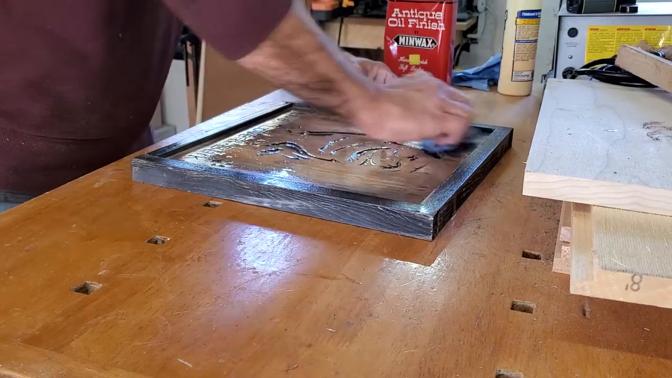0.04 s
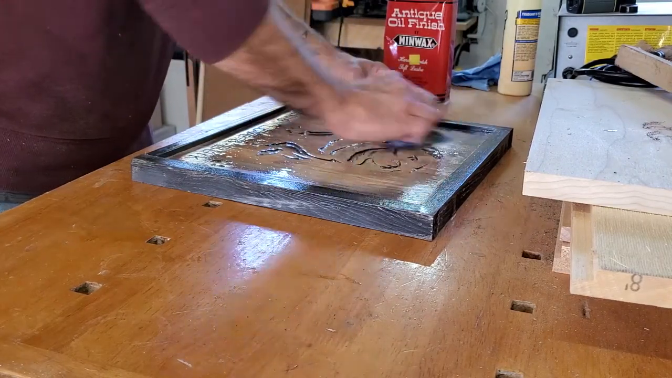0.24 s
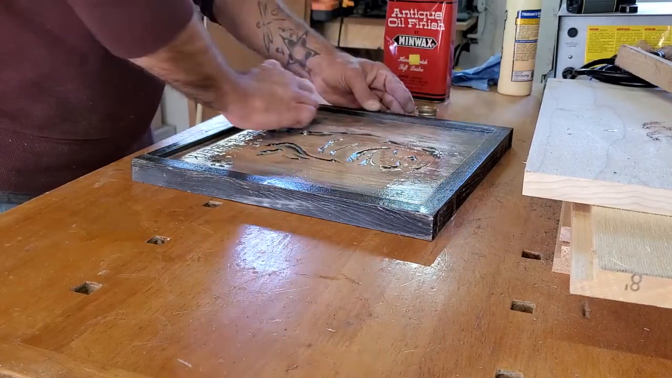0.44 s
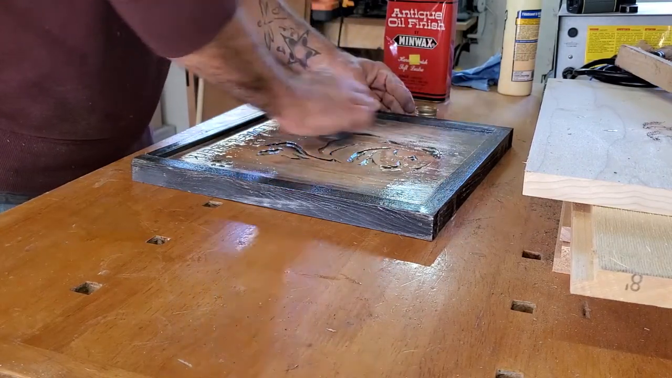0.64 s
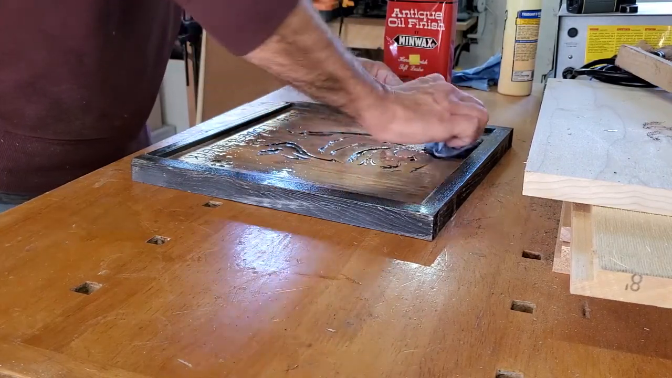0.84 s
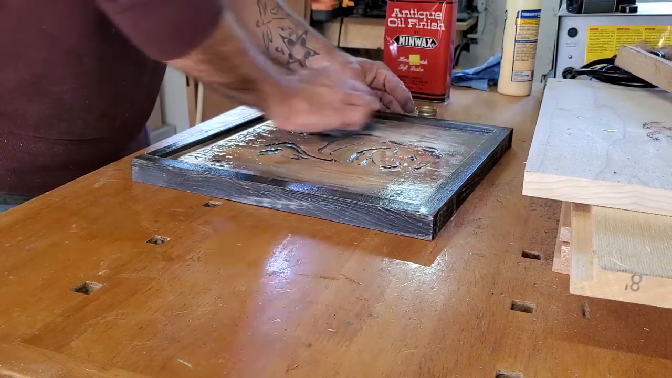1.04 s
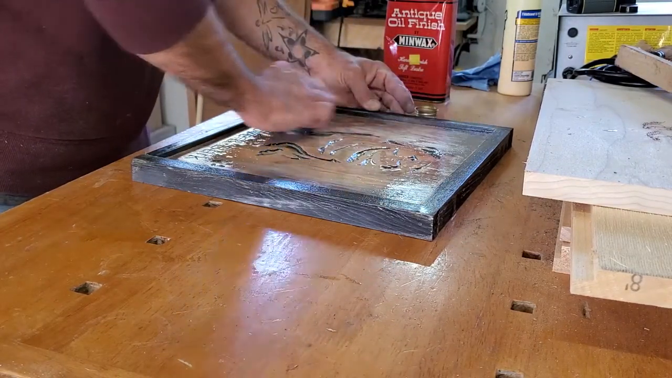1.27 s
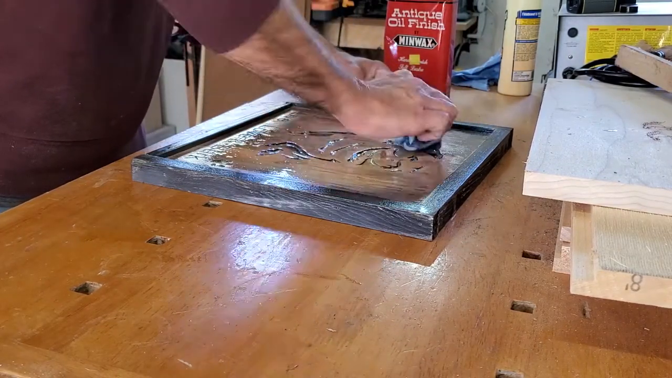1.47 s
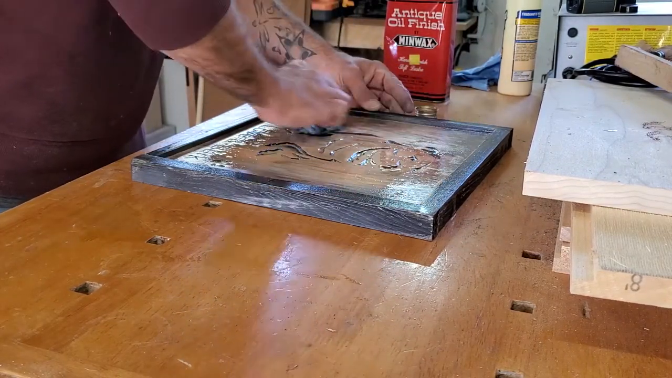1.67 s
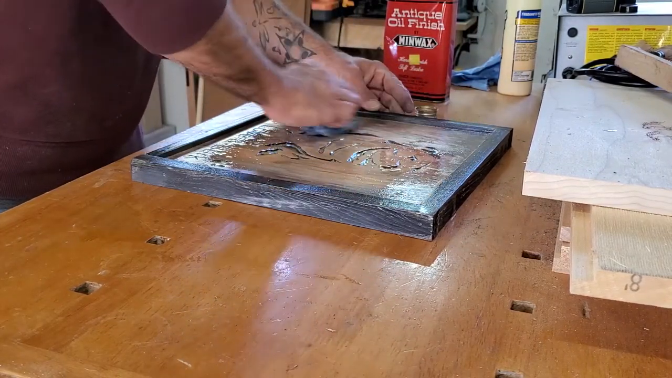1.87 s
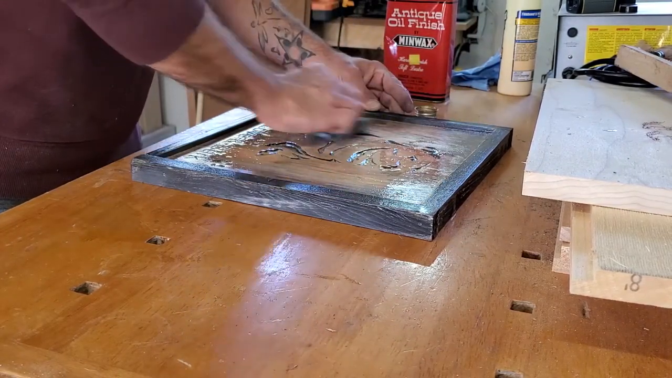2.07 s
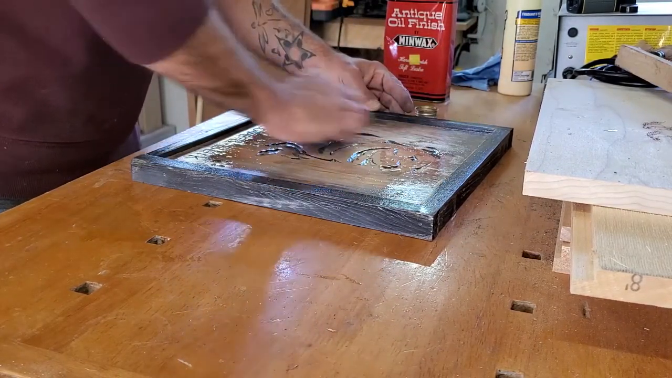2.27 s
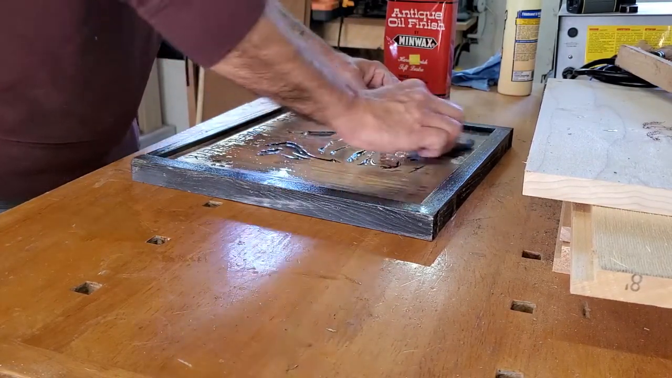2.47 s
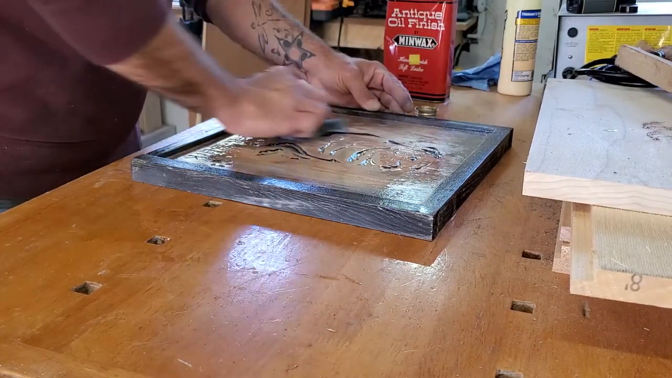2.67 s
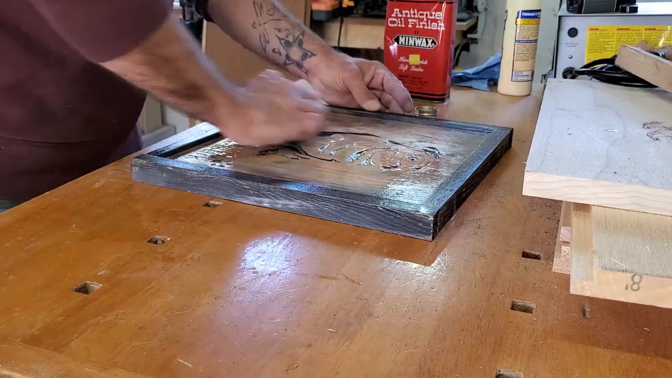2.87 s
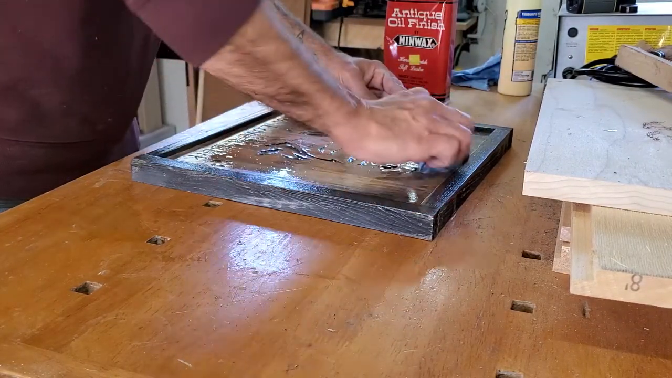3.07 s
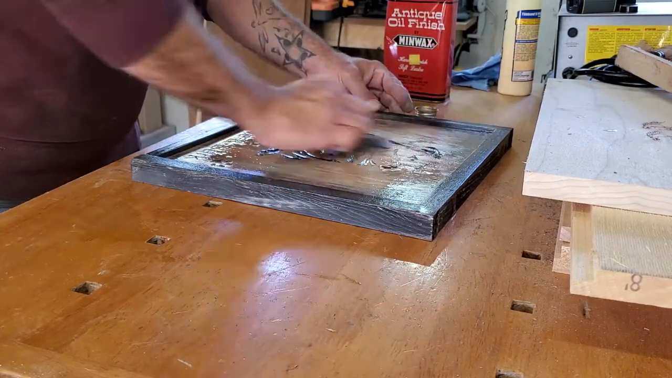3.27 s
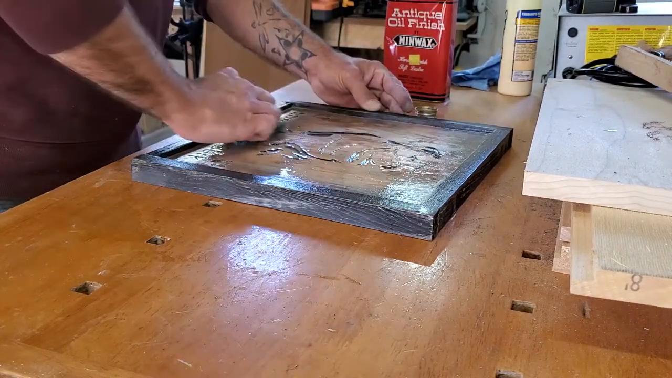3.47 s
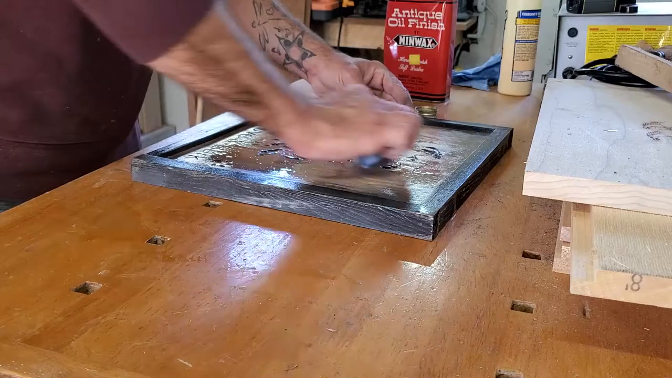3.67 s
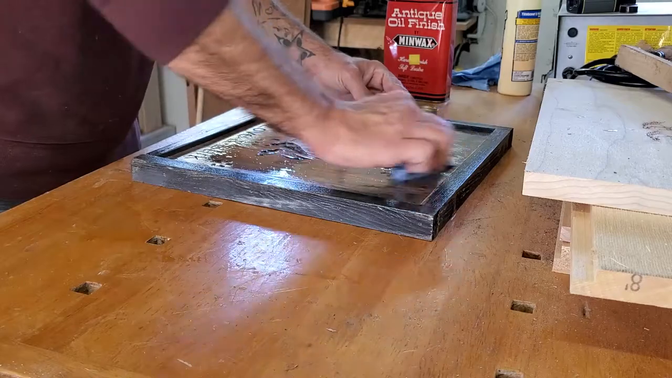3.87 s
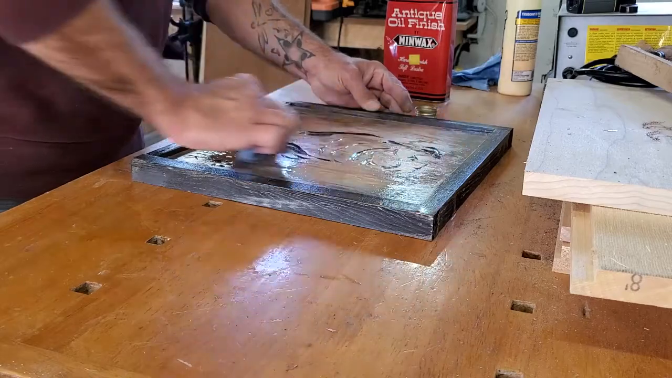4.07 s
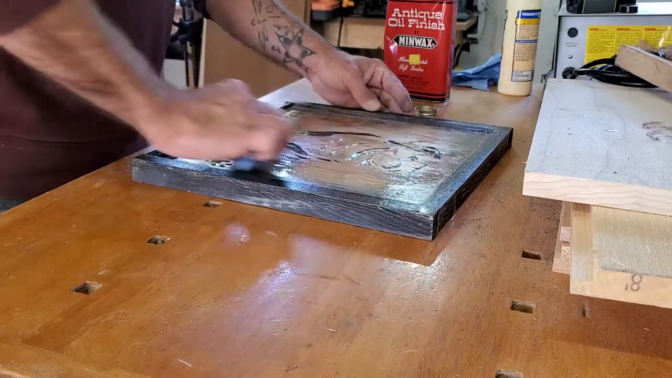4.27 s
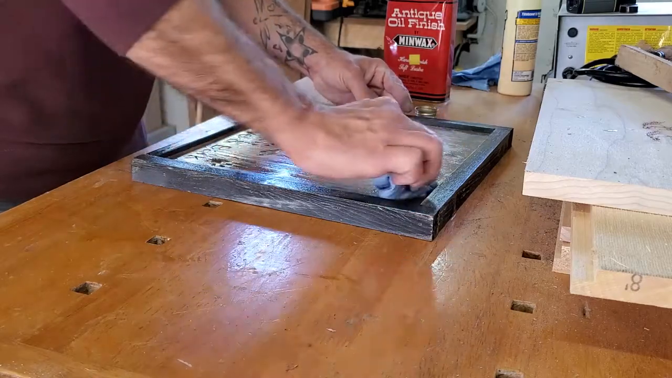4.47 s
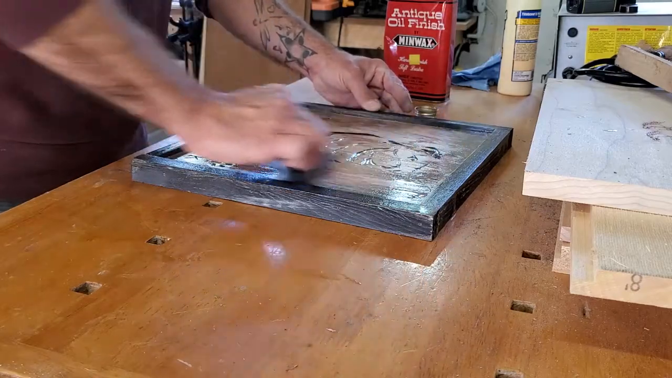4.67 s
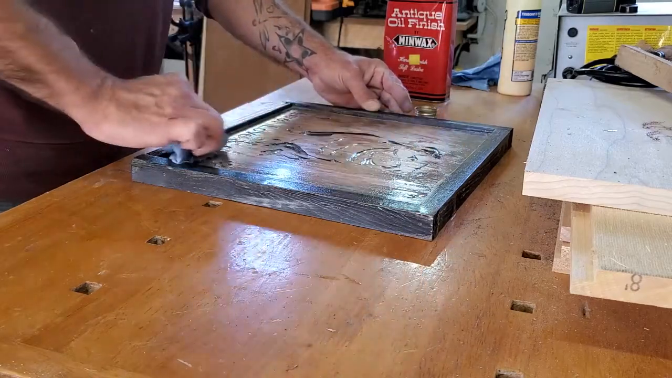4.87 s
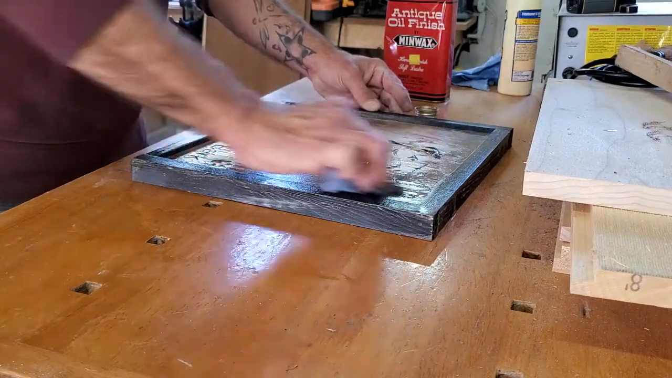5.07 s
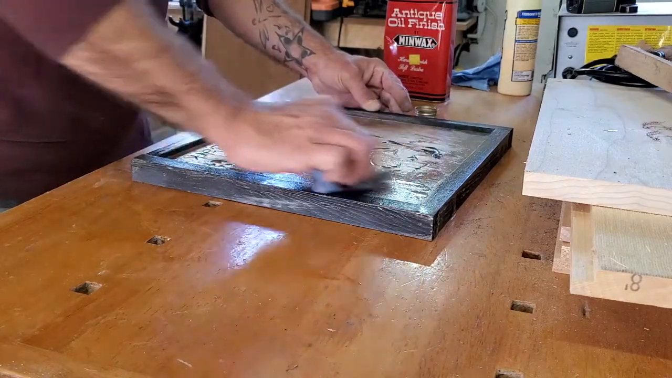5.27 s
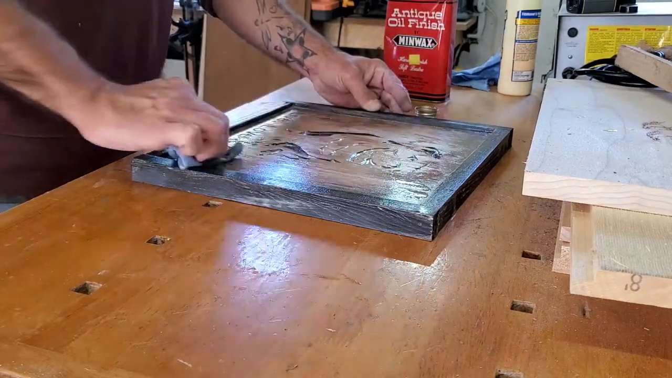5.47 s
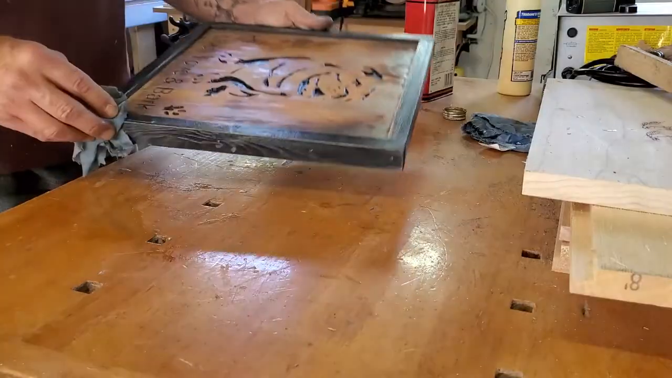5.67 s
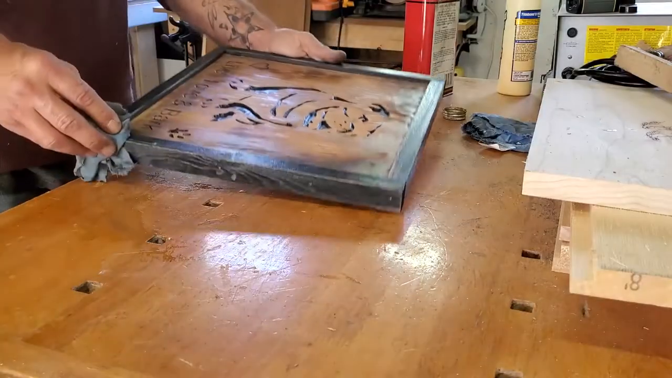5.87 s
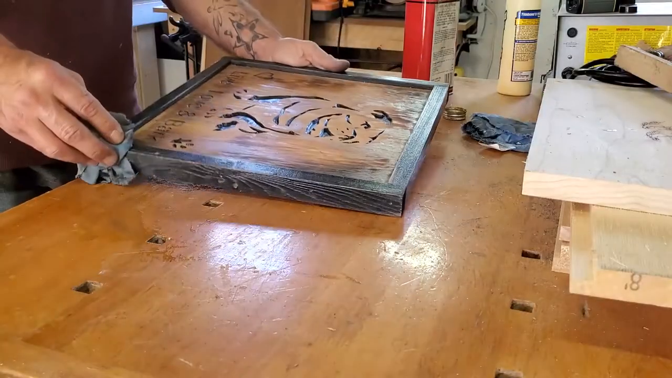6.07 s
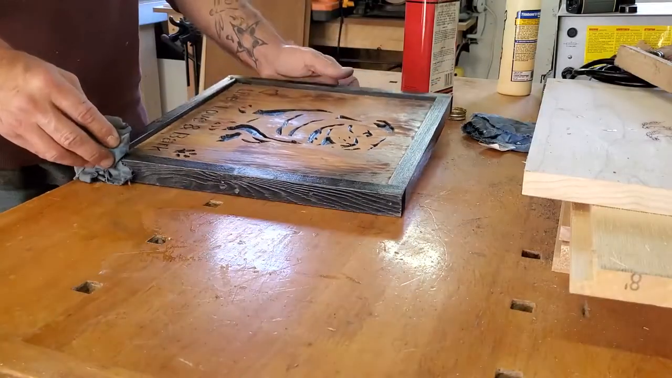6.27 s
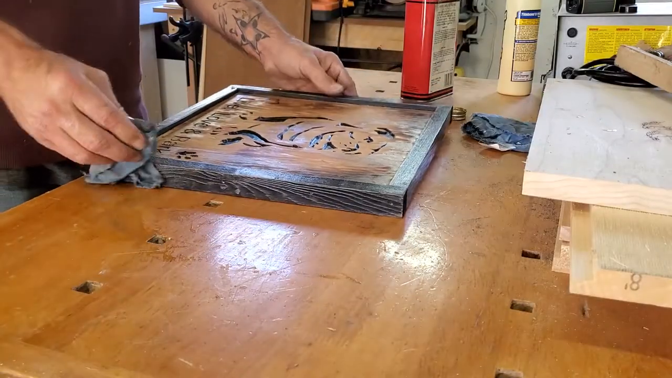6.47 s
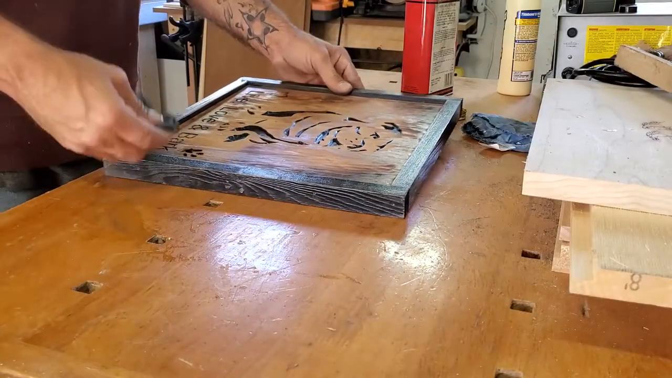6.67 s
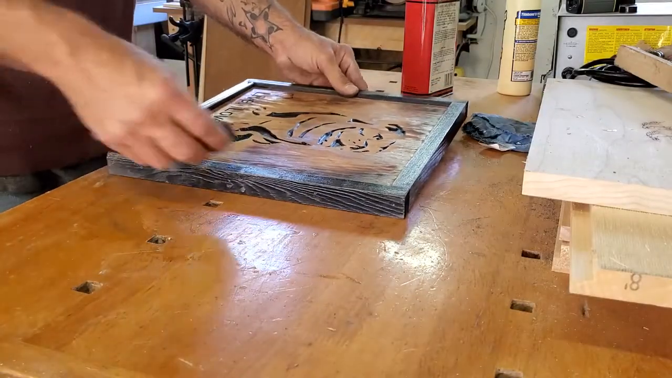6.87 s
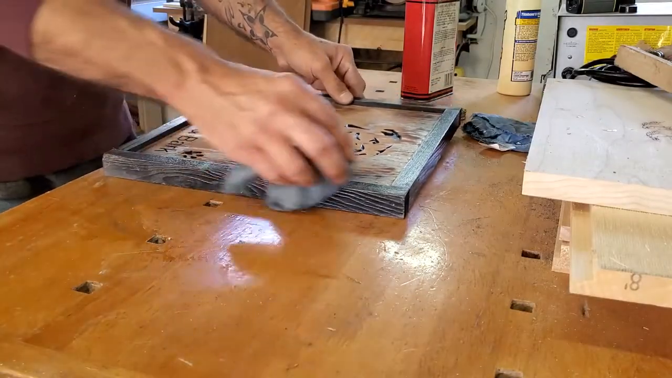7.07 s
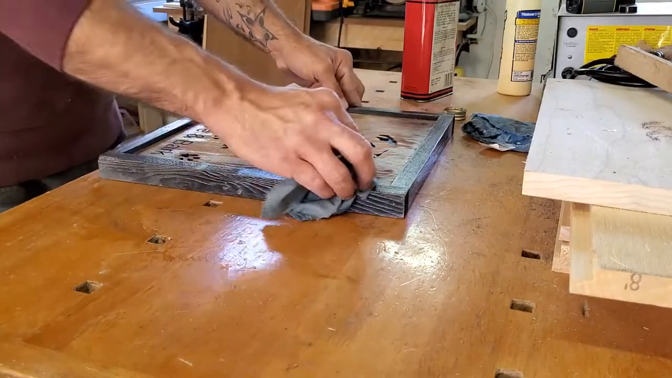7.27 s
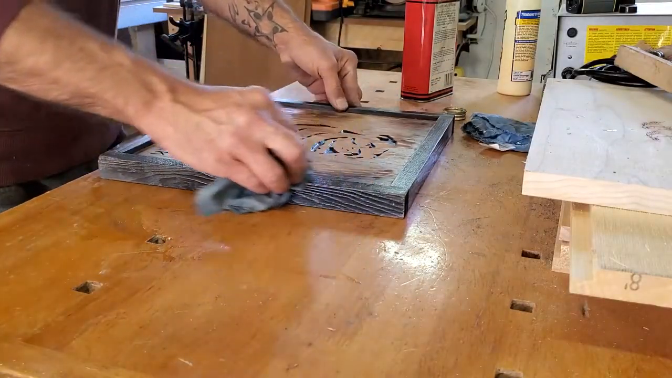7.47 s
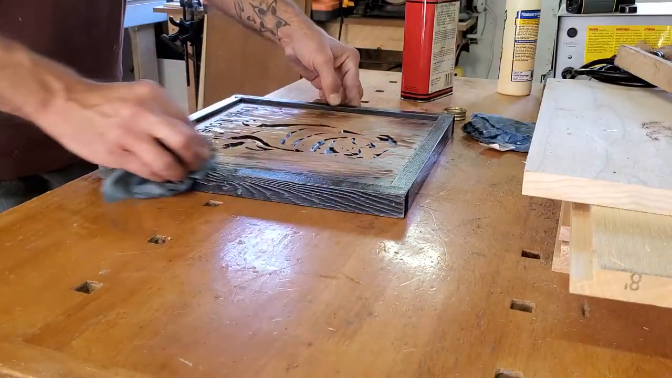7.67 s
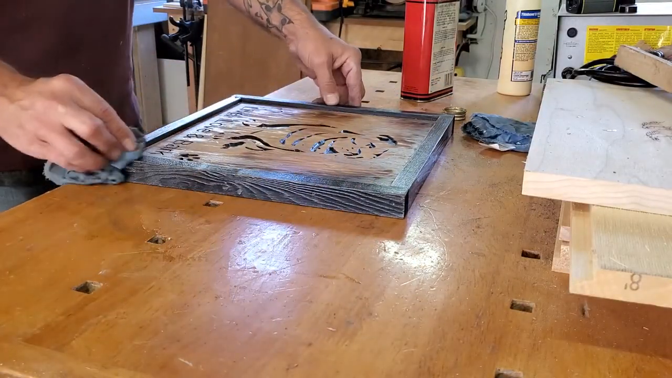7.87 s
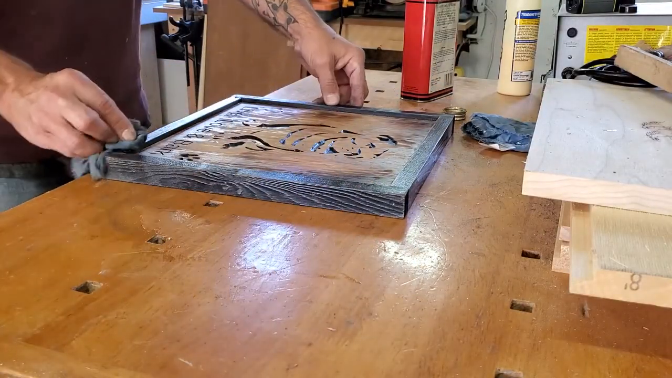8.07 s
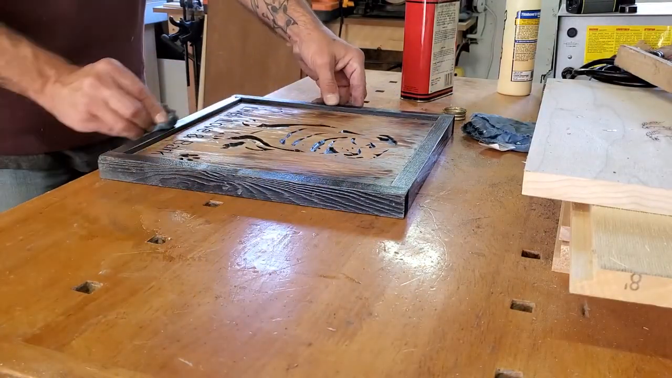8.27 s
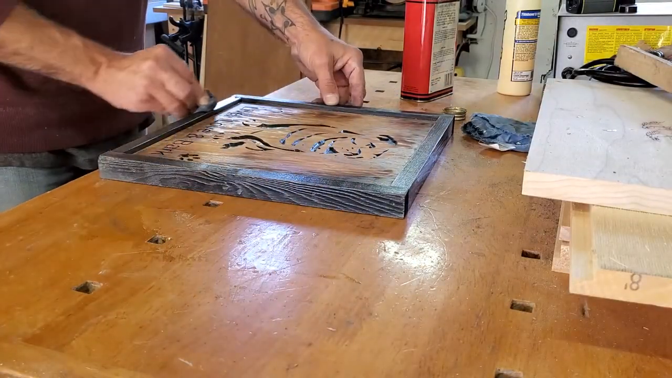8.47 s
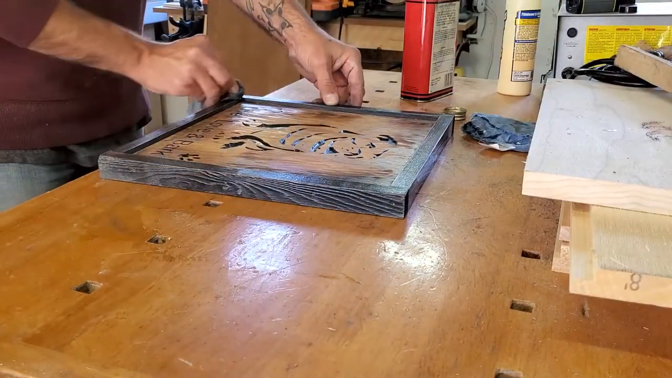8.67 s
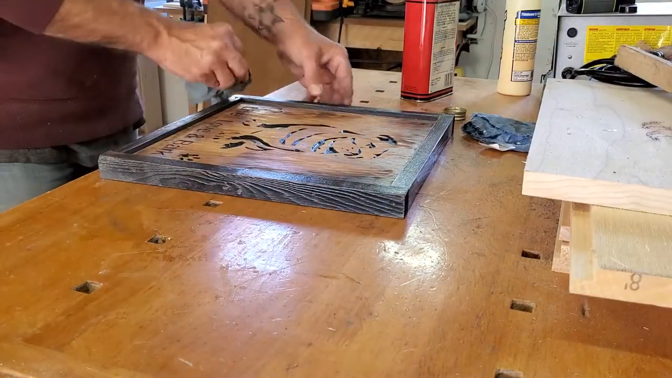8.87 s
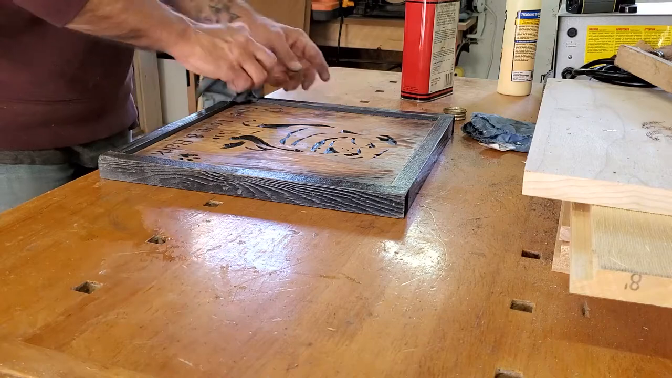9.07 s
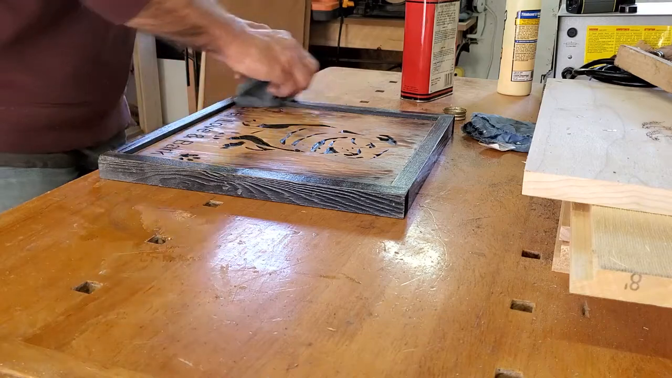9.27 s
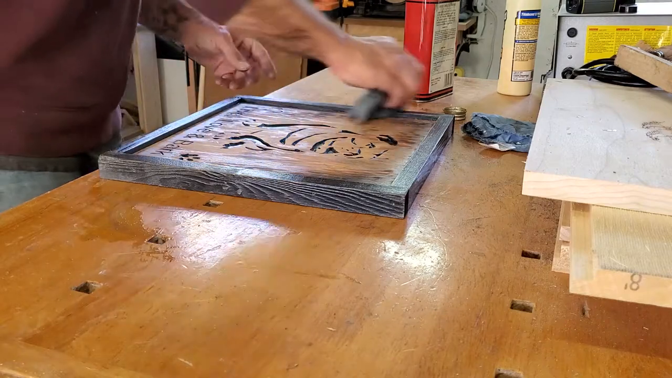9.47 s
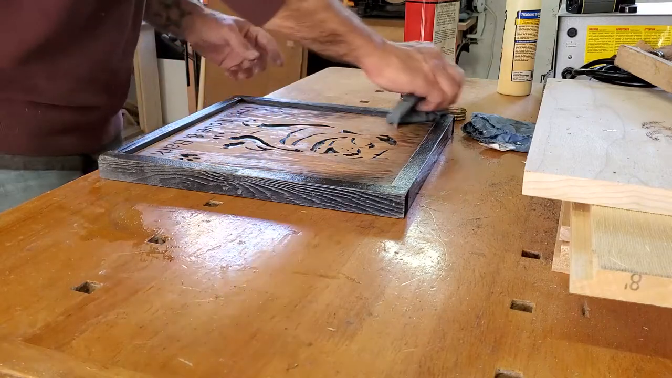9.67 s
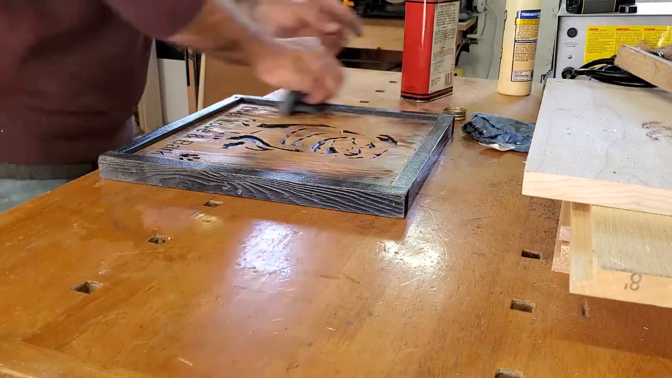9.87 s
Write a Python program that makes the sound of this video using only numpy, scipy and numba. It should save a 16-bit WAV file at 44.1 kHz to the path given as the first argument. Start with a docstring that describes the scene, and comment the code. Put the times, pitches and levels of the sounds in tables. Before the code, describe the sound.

From the start until about 5.5 seconds, a cloth rag wipes an oiled, carved wooden tray in quiet, uneven strokes, roughly three a second. Each has a soft hiss and a light, slightly hollow wooden rasp. Tiny ticks come near 0.2 and 0.9 seconds, with occasional faint squeaks and soft bumps near 2.9 and 3.6 seconds. At 5.8 seconds the tray clatters as it is turned, then lands on the workbench at 6 seconds with a sharp, briefly ringing knock, the loudest moment, and a short slide. Lighter knocks and scrapes follow around 6.5 and 7.1 seconds. The wiping continues in softer, slower strokes, with two firmer swipes and small squeaks between 9.2 and 10 seconds. Underneath are faint workshop air and a low hum that grows stronger from about 5.6 seconds. The microphone is about a metre away, and the knocks have a short, dull echo.

```python
"""Wiping a wooden tray

A cloth rag wipes an oiled, carved tray on a workbench, a metre from a phone. With each stroke
the fibres hiss and the wood rasps; now and then a thread snaps or the oily cloth squeaks.
Midway the tray is turned, knocks down and slides, and then the wiping goes on.
A low hum and the faint air of a small workshop lie underneath."""
import sys
import numpy as np
from scipy import signal
from scipy.fft import rfft, irfft
from scipy.io import wavfile
from scipy.ndimage import uniform_filter1d
from numba import njit

SR = 44100
rng = np.random.default_rng(int(sys.argv[2]) if len(sys.argv) > 2 else 0)


def generate_wav(signal):
    """Clip the signal to [-1, 1] and save it as 16-bit WAV at the path in sys.argv[1]."""
    frames = np.transpose(np.atleast_2d(signal))
    scaled = np.clip(frames, -1, 1) * 32767
    pcm = np.round(scaled).astype(np.int16)
    wavfile.write(sys.argv[1], SR, pcm)


N = 437472
T = np.arange(N) / SR

# The tray's natural notes. Each row: pitch in Hz, relative level in dB, seconds to fade by 60 dB.
TRAY_NOTES = [(70.5, -7.5, 0.27), (104, -10, 0.19), (150, -25, 0.088), (264, -1, 0.2), (322, 2, 0.12),
              (441, -8.5, 0.096), (509, -8.5, 0.096), (546, -1, 0.097), (770, -6.5, 0.079),
              (997, -21.5, 0.069), (1185, -16, 0.13), (1340, -10, 0.11), (1551, -30, .1), (1718, -12, 0.11),
              (1957, -30, .08), (2165, -34, .08)]


def undb(db):
    """Turn decibels into a gain."""
    return 10 ** (np.asarray(db) / 20)


def level(x, db):
    """Scale a sound to an average level in dB."""
    return x * undb(db) / np.sqrt(np.mean(x ** 2))


def curves(table):
    """Turn rows that start with a time into one curve for each other column."""
    times, *columns = np.transpose(table)
    return [np.interp(T, times, column) for column in columns]


def over_pitch(table):
    """Spread rows of (Hz, value) over the whole spectrum."""
    hz, value = np.transpose(table)
    return np.interp(np.log(np.arange(N // 2 + 1) * SR / N + 1), np.log(hz), value)


def wander(rate):
    """A smooth random wobble of size about 1 that changes `rate` times a second."""
    hold = int(SR / rate)
    steps = np.repeat(rng.standard_normal(N // hold + 1), hold)
    return 1.387 * uniform_filter1d(uniform_filter1d(steps, hold), hold)[:N]


def stereo_noise(grain_db=0):
    """Noise whose two sides are most alike in the bass; more grain_db makes it grittier."""
    # Each row: frequency in Hz, how alike left and right are from 0 to 1.
    likeness = [(60, .95), (600, .8), (1400, .55), (3100, .33), (6800, .2), (15000, .15)]
    alike = np.clip(over_pitch(likeness), 0, 1)
    mid, side = rfft(rng.standard_normal((2, N)) * undb(grain_db * rng.exponential(size=N)))
    return irfft(np.sqrt(1 + alike) * mid + np.sqrt(1 - alike) * side * np.array([[1], [-1]]), N)


def colour(x, table):
    """Shape a sound's tone by rows of (Hz, dB), then set its level to 0 dB."""
    return level(irfft(rfft(x) * undb(over_pitch(table)), N), 0)


@njit
def bandpass(x, hz, width):
    """Keep a band `width` Hz wide around a pitch that can move."""
    out, band_state, low_state = np.empty(len(x)), 0., 0.
    for i in range(len(x)):
        tune, damping = np.tan(np.pi * hz[i] / SR), width / hz[i]
        band = (band_state + tune * (x[i] - low_state)) / (1 + tune * (tune + damping))
        band_state = 2 * band - band_state
        low_state += 2 * tune * band
        out[i] = damping * band
    return out


def band_each(x, hz, width):
    """Apply the band-pass to each channel."""
    return np.array([bandpass(channel, hz + np.zeros(N), float(width)) for channel in x])


def resonate(x, peaks):
    """Let a sound ring at steady pitches, given as rows of (Hz, width in Hz, dB)."""
    return sum(undb(db) / np.sqrt(width) * band_each(x, hz, width) for hz, width, db in peaks)


def swells(start, length, db, fastest, sharpness, turn_s=0.023):
    """Loudness of hand moves that speed up and slow down; turning round takes turn_s."""
    power = np.zeros(N)
    moves = np.broadcast(start, length, db, np.clip(fastest, .05, .95), sharpness)
    for at, span, peak_db, peak_share, sharp in moves:
        part = slice(max(int(at * SR), 0), int((at + span) * SR))
        angle = np.interp(T[part], [at, at + peak_share * span, at + span], [0, np.pi / 2, np.pi])
        power[part] += (undb(peak_db) * np.abs(np.sin(angle)) ** sharp) ** 2
    return np.sqrt(np.abs(uniform_filter1d(power, int(turn_s * SR))))


def rag_wipes(lift_s=5.57, rest_db=-90, pressed_db=-76):
    """Countless tiny fibre slips swish, hiss and rasp, louder as the hand moves faster."""
    # Each row: start in seconds, length in seconds, swish in dB, fastest point from 0 to 1,
    # sharpness (low is an even pace), hiss boost in dB, rasp boost in dB, rasp pitch in Hz.
    wipes = [(-.150, 0.21, -56.5, 0.4, 1, 5, -4.5, 1800), (0.084, 0.39, -55.5, 0.46, 1.12, -4, -5, 1800),
             (0.459, 0.34, -54.5, 0.56, 0.88, 5, -3, 1500), (0.822, 0.34, -56, 0.42, 0.83, -1, -5.5, 1500),
             (1.16, 0.27, -56, 0.62, 0.83, 3, -1, 1400), (1.437, 0.19, -58.5, 0.56, 1.2, -3, -7, 1480),
             (1.627, 0.13, -61.5, 0.35, 0.64, 2, -1, 1520), (1.76, 0.1, -59, 0.23, 0.68, 0, -4.5, 1550),
             (1.865, 0.086, -61, 0.64, 0.75, 1.5, -1.5, 1550), (1.961, 0.18, -60, 0.6, 0.89, 3, -4, 1550),
             (2.134, 0.25, -57, 0.55, 0.62, 2.5, -0.5, 1550), (2.409, 0.35, -58.5, 0.34, 0.9, 0, -1, 1570),
             (2.74, 0.31, -55, 0.55, 1.12, 1.5, 0.5, 1600), (3.041, 0.39, -57.5, 0.44, 1.5, 2.5, -3, 1400),
             (3.407, 0.37, -58, 0.43, 1.16, 3, 2.5, 1650), (3.789, 0.31, -59.5, 0.61, 0.87, 5, -1.5, 1700),
             (4.106, 0.33, -61, 0.68, 0.72, 4, 3, 1900), (4.464, 0.31, -63, 0.79, 0.34, 4, 1.5, 2000),
             (4.812, 0.27, -59, 0.31, 0.43, 2, 1, 1950), (5.11, 0.35, -62.5, 0.47, 0.86, 4, 0.5, 1900),
             (5.447, 0.1, -64, 0.64, 1.2, 0, 0.5, 1700), (5.965, 0.33, -70.5, 0.23, 0.66, 0.5, 7.5, 1600),
             (6.276, 0.18, -71.5, 0.6, 1.2, -2, 3.5, 1550), (6.471, .13, -69.5, 0.2, 1.3, -4, 4.5, 1500),
             (6.868, 0.2, -68, 0.56, 1.6, 3.5, 1, 1700), (7.074, 1, -63.5, 0.46, 1.35, -0.5, -2, 1400),
             (7.870, 0.22, -63.5, 0.18, 0.74, 3.5, -7, 1500),
             (8.007, 0.63, -63, 0.59, 0.56, 9.5, -10, 1650), (8.611, 0.13, -65.5, 0.54, 1.5, 3, -4, 1650),
             (9.047, 0.45, -65.5, 0.47, 0.68, 4.5, -1, 1830), (9.216, .27, -56, 0.59, 1.74, 6, 3, 2090),
             (9.507, 0.46, -59.5, 0.57, 1.9, 4, -1, 2280)]
    # Tone of the swish and of the finer hiss. Each row: frequency in Hz, relative level in dB.
    swish_tone = [(1290, -47), (2200, -5.5), (5600, 1.5), (7140, 2), (9840, -2.5), (10500, 2.5),
                  (13600, -17)]
    hiss_tone = [(8500, -49), (9800, -31), (11300, 6.5), (13800, 3.5), (15200, 6)]
    start, length, db, fastest, sharpness, *grip = np.transpose(wipes)
    lying_flat = 1 / (1 + np.exp(np.clip((T - lift_s) / 0.0051, -50, 50)))  # 1 until the tray lifts
    strokes = swells(start, length, db, fastest, sharpness)
    # Between strokes the rag still whispers, more so while pressed on the flat tray.
    swish_db = 20 * np.log10(strokes + undb(rest_db) + lying_flat * undb(pressed_db))
    hiss_db, rasp_db, rasp_hz = curves(np.transpose([start + fastest * length, *grip]))
    catch_db = .3 * wander(22) + 1.3 * wander(300)
    fibres = fibre_slips()
    swish = colour(fibres, swish_tone)
    hiss = colour(stereo_noise(grain_db=2), hiss_tone) * undb(hiss_db + wander(18))
    rasp = wood_rasp(fibres, rasp_hz, rasp_db, lying_flat)
    pocket = air_pocket(swish_db + rasp_db) * lying_flat
    return (swish + hiss + rasp) * undb(swish_db + catch_db) + pocket


def fibre_slips(patchy_db=3):
    """Cloth folds and wood grain make narrow, drifting bands of noise swell and sink."""
    fibres = stereo_noise(grain_db=1.3)
    for patch_hz in 1200 * 2 ** (np.arange(11) / 4):
        hz = patch_hz * (1 + .05 * wander(10))
        fibres = fibres + (undb(patchy_db * wander(40)) - 1) * band_each(fibres, hz, patch_hz / 16)
    return fibres


def wood_rasp(fibres, hz, boost_db, lying_flat):
    """The carving makes the rasp waver in pitch; rubbing also rings the flat tray's high notes."""
    hz = hz * (1 + .035 * wander(18))
    narrow = level(band_each(fibres, hz, 400) + 0.24 * band_each(fibres, 2 * hz, 230), -9.5)
    # Tone of the broad rasp. Each row: frequency in Hz, relative level in dB.
    rasp_tone = [(800, -43), (1200, 3.5), (2400, -3), (4000, -5.5), (8000, -59)]
    broad = level(colour(fibres, rasp_tone), -7)
    # Each note, damped by the hand, swells and fades as the rag crosses the tray.
    ring = sum(resonate(fibres, [(note_hz, 9.4, 0)]) * undb(3 * wander(14))
               for note_hz, *_ in TRAY_NOTES if note_hz > 1100)
    rasp = narrow * undb(0.47 * boost_db) + broad + level(ring, -15.5) * lying_flat
    return rasp * undb(boost_db + .6 * wander(22) + 1.2 * wander(70))


def air_pocket(rub_db):
    """Rubbing makes the air under the tray sound a hollow note."""
    # The pocket's notes. Each row: pitch in Hz, width in Hz, relative level in dB.
    pocket_notes = [(355.3, 19, 7), (266, 8.5, -12), (754, 104, 3)]
    return level(resonate(stereo_noise(), pocket_notes), -11) * undb(rub_db)


def low_hum():
    """A low tone and a rumble swell together; midway the tone drops, then climbs back."""
    # The hum's course. Each row: time in seconds, pitch in Hz, level in dB.
    hum_course = [(0, 73.1, -66), (1.1, 73.4, -66.5), (1.7, 73.3, -70.5), (3.5, 72, -68), (4, 72.36, -65.5),
                  (5.3, 73.76, -68.5), (5.6, 64.8, -59.5), (6.2, 66.8, -57), (8, 69.1, -56),
                  (9.92, 73.5, -55)]
    hz, db = curves(hum_course)
    waver_db = 2 * wander(7)
    tone = np.sin(2 * np.pi * np.cumsum(hz * (1 + .006 * wander(6))) / SR)
    rumble = resonate(rng.standard_normal((1, N)), [(64, 36, 39), (51.4, 12, 2.6)])
    rumble = resonate(rumble, [(62, 40, 0)])[0]
    return level(tone, 0) * undb(db + waver_db) + level(rumble, -70.5) * undb(db - db.mean())


def workshop_air(db=-67):
    """A faint, deep rush that gently rises and falls."""
    # Tone of the air. Each row: frequency in Hz, relative level in dB.
    air_tone = [(20, -21), (49, 3), (100, -7.5), (165, -23.5), (300, -17.5), (880, -20.5), (1500, -26),
                (5900, -35.5), (15700, -47)]
    return colour(stereo_noise(), air_tone) * undb(db + 1.5 * wander(3))


def thread_ticks():
    """Snapping threads and small ticks: a tiny ping with a burst of bright noise."""
    # Each row: time in seconds, strength in dB, pitch in Hz, left minus right in dB.
    ticks = [(0.164, -43, 4900, 20), (0.9156, -35, 11600, 16), (3.883, -45.5, 10500, -21),
             (6.3925, -46.5, 6000, 12)]
    out, t = np.zeros((2, N)), T[:300]
    for start, db, hz, pan_db in ticks:
        snap = np.diff(rng.standard_normal(len(t)), prepend=0)
        burst = (np.sin(2 * np.pi * hz * t) + .7 * snap) * np.exp(-t / .0006)
        i = int(start * SR)
        out[:, i:i + len(t)] += undb([[db + pan_db / 2], [db - pan_db / 2]]) * burst
    return out


def cloth_squeaks():
    """Oily cloth catches on the wood: a gliding band of noise with a weaker one an octave up."""
    # Each row: start and end in seconds, first and last pitch in Hz, width in Hz, strength in dB.
    squeaks = [(.45, .53, 6250, 6450, 80, -57), (.495, .55, 1300, 1500, 500, -61),
               (2.88, 2.93, 2000, 1700, 1500, -57), (3.612, 3.69, 2300, 1250, 900, -54),
               (4.28, 4.36, 2000, 1850, 300, -61), (4.95, 5.03, 2150, 1850, 350, -50),
               (5.33, 5.41, 1900, 950, 200, -59), (7.52, 7.62, 1300, 1200, 200, -64),
               (9.714, 9.775, 3300, 2600, 2200, -53), (9.6, 9.92, 650, 600, 500, -70),
               (9.8, 9.875, 2400, 1600, 350, -62)]
    out, slips = 0, rng.standard_normal(N)
    for start, end, first_hz, last_hz, width, db in squeaks:
        progress = np.clip((T - start) / (end - start), 0, 1)
        hz = first_hz + (last_hz - first_hz) * progress
        swell = np.sin(np.pi * progress ** .8)  # catches fast, lets go slowly
        for multiple, gain in ((1., 0.92), (2., undb(-8))):
            band = bandpass(slips, multiple * hz, multiple * width)
            band = bandpass(band, multiple * hz, 2 * multiple * width)
            out = out + gain * level(band, db) * swell
    return out


def tray_knocks(spot_boost_db=6.5, spot_octaves=0.15, crack_hz=1460, crack_fade_s=0.085):
    """The catching rag or the bench strikes the tray, which cracks and rings, damped by the hand."""
    # Each row: time in seconds, strength in dB, contact time in milliseconds,
    # pitch in Hz that the struck spot favours, share of the ring time left from 0 to 1.
    knocks = [(2.899, -49.5, 3.8, 154, 0.89), (3.568, -52.5, 3.3, 158, 0.7),
              (5.787, -29.5, 0.47, 280, 0.67), (5.807, -36, 0.73, 297, 1), (5.837, -33.5, 0.61, 723, 0.65),
              (6.011, -28.5, 1.8, 406, 0.9), (6.025, -19, 0.44, 760, 0.13), (6.035, -22, 0.63, 588, 0.62),
              (6.06, -37, 1.4, 288, 0.9), (6.335, -64.5, 1.3, 268, 1), (6.521, -47.5, 0.67, 347, 1),
              (6.544, -29.5, 2.55, 105, 0.2), (6.571, -57, 1.53, 104, 0.3), (7.144, -36, 1.35, 435, 0.19),
              (7.166, -33, 1.9, 200, 0.06), (7.908, -53.5, 0.094, 1350, 0), (8.685, -54, 1.5, 337, 0.2)]
    out, t = np.zeros((2, N)), T[:SR // 2]
    hz, db, ring_s = np.transpose(TRAY_NOTES)[:, :, None]
    sign = (-1) ** np.arange(len(hz))[:, None]  # neighbouring notes swing opposite ways
    sign[2] = -1  # but the second to fourth swing together
    chance = rng.standard_normal((len(knocks), 2, len(hz), 1))
    crack = level(resonate(stereo_noise(), [(crack_hz, 1500, 0)]), -7)
    # Higher notes reach the two microphones further out of step.
    offset = np.array([.25, -.25])[:, None, None] * np.minimum(hz / 916, 2) ** 2 * sign
    for (start, blow_db, contact_ms, spot_hz, share), (scatter_db, detune) in zip(knocks, chance):
        spot_db = spot_boost_db * np.exp(-(np.log2(hz / spot_hz) / spot_octaves) ** 2)
        fade = undb(-60 * t / (ring_s * np.clip(share, .1, 1)))
        notes = sign * np.sin(2 * np.pi * hz * (1 + 0.003 * detune) * t + offset)
        ring = np.sum(undb(db + spot_db + scatter_db) * fade * notes, axis=1)
        i = int(start * SR)
        ring += crack[:, i:i + len(t)] * undb(-60 * t / crack_fade_s)
        push = np.sin(np.pi * np.clip(t[:400] * 1000 / contact_ms, 0, 1))  # longer sounds duller
        out[:, i:i + len(t)] += undb(blow_db) * signal.lfilter(push / push.sum(), 1, ring)
    return out


def wall_echo(x, fade_s=0.28, db=-13.5, cutoff_hz=1740):
    """The walls scatter back a short, dull echo, different on each side."""
    t = T[:SR]
    tail = signal.lfilter(*signal.butter(1, cutoff_hz, fs=SR), stereo_noise()[:, :SR])
    tail *= undb(-60 * t / fade_s) * (t > .004)
    tail /= np.sqrt(np.sum(tail[0] ** 2))
    return undb(db) * signal.fftconvolve(x[None], tail, axes=1)[:, :N]


def tray_slides():
    """The tray's edge sticks and slips on the bench, which makes it ring."""
    # Each row: start in seconds, length in seconds, level in dB, fastest point from 0 to 1.
    slides = [(6.053, 0.23, -55.5, 0), (6.458, 0.31, -69.5, 0.4), (6.85, 0.31, -61.5, 0.09),
              (7.073, 0.1, -53, 0.49)]
    # The edge's notes. Each row: pitch in Hz, width in Hz, relative level in dB.
    edge_notes = [(538, 19, -3.5), (799, 10, -8), (978, 81, 1), (1308, 56, 3)]
    slip_db = 1.8 * wander(60)
    scrape = level(resonate(stereo_noise(grain_db=3.4), edge_notes), 0)
    return scrape * undb(slip_db) * swells(*np.transpose(slides), sharpness=1.2)


def scene():
    """Mix the sounds on the bench with the air, the echo of the knocks and the hum."""
    lean_left = undb([[.5], [-.5]])
    knocks = tray_knocks()
    air = workshop_air()
    bench = rag_wipes() + tray_slides() + thread_ticks() + cloth_squeaks() + knocks * lean_left
    bench[1] = np.roll(bench[1], 2)  # reaches the right microphone two samples later
    return bench + air + wall_echo(knocks[0]) + low_hum() * lean_left


def record(dry):
    """The phone drops the deepest bass and cuts the highest treble steeply."""
    bottom_hz, top_hz = 39.4, 15780
    thin = signal.sosfilt(signal.butter(3, bottom_hz, "high", fs=SR, output="sos"), dry)
    return signal.sosfilt(signal.ellip(12, .2, 80, top_hz, fs=SR, output="sos"), thin)


dry = scene()
out = record(dry)
generate_wav(out)
```